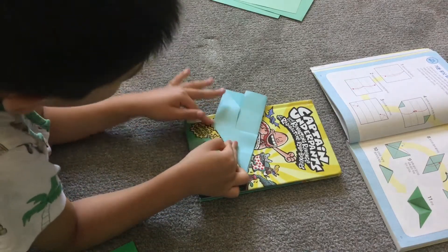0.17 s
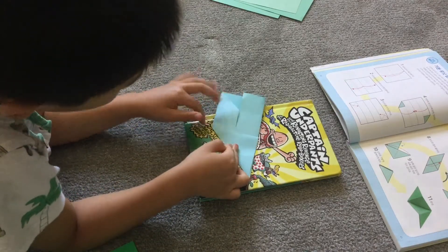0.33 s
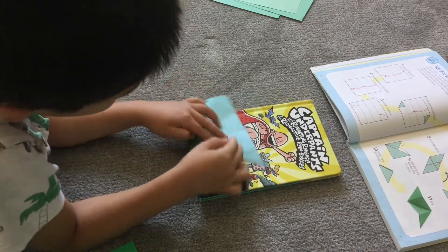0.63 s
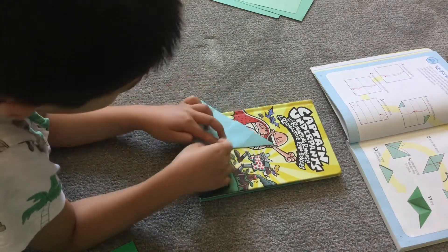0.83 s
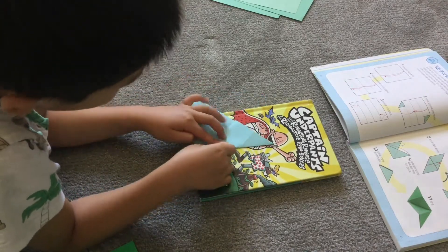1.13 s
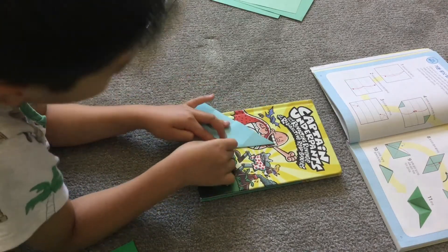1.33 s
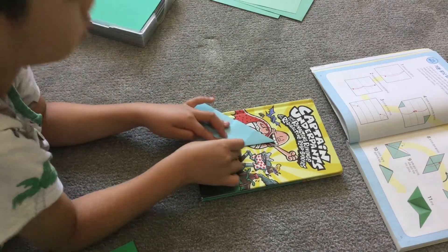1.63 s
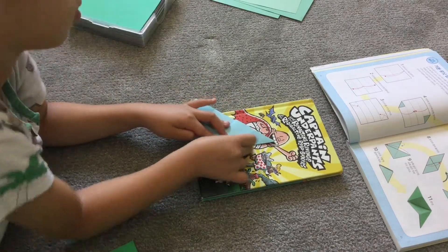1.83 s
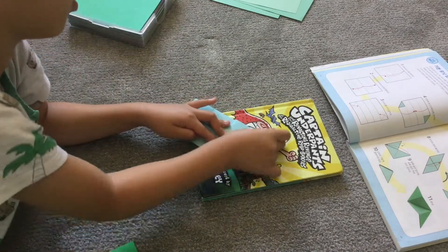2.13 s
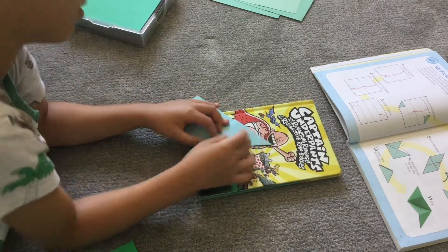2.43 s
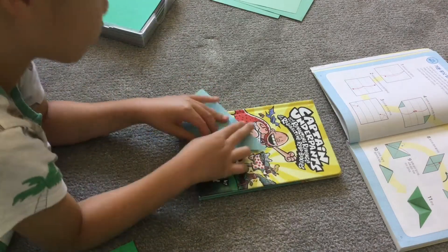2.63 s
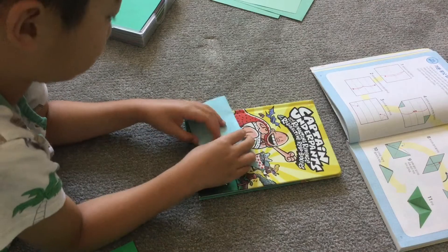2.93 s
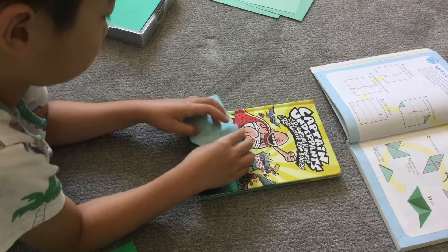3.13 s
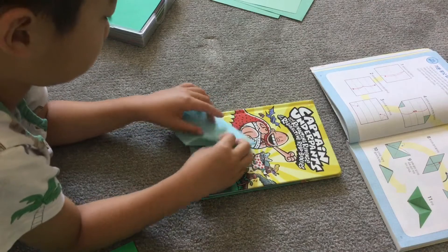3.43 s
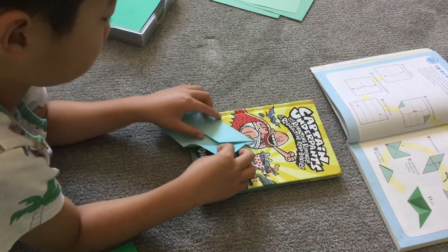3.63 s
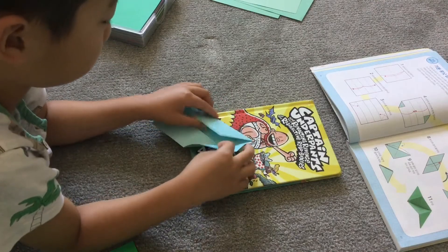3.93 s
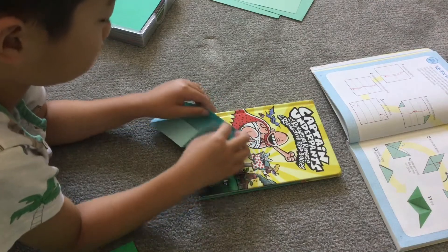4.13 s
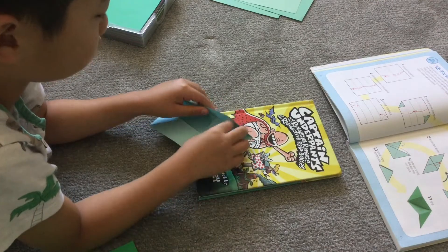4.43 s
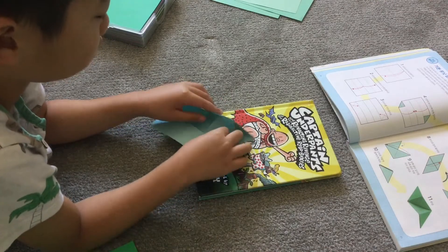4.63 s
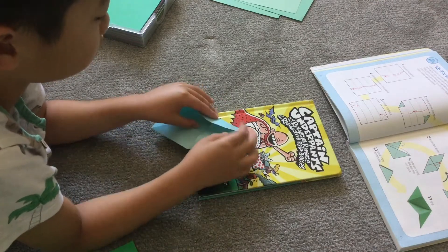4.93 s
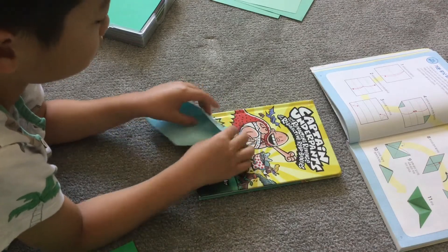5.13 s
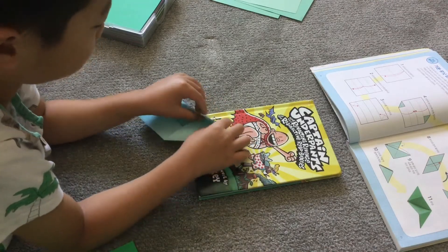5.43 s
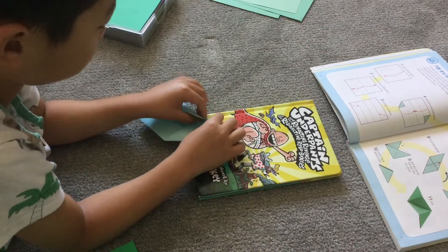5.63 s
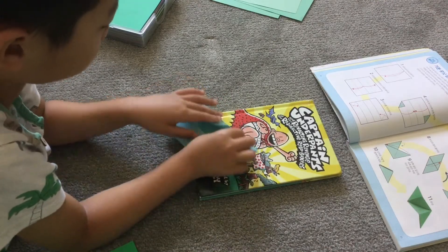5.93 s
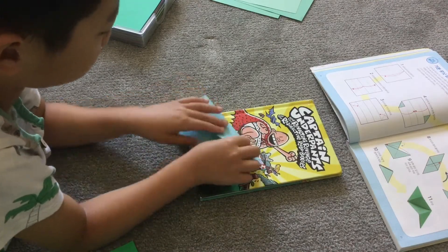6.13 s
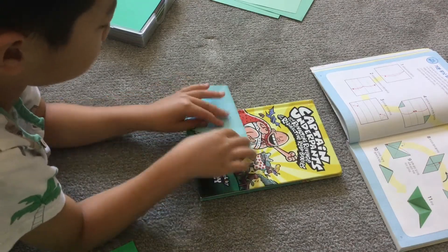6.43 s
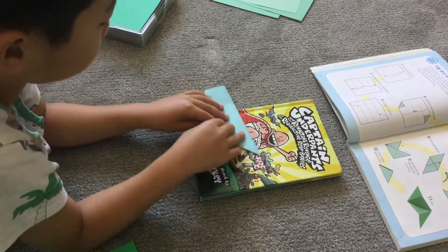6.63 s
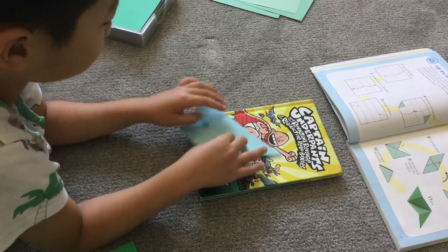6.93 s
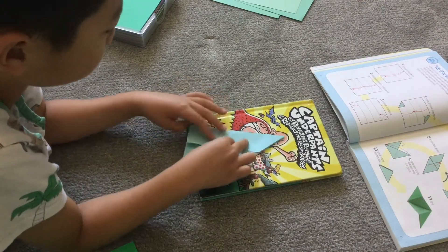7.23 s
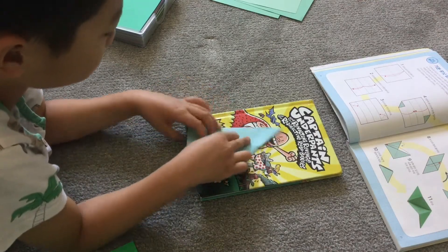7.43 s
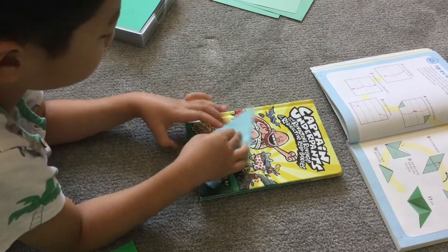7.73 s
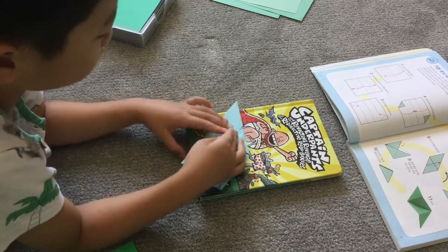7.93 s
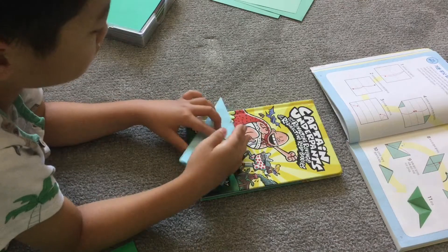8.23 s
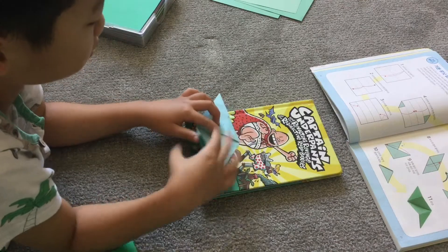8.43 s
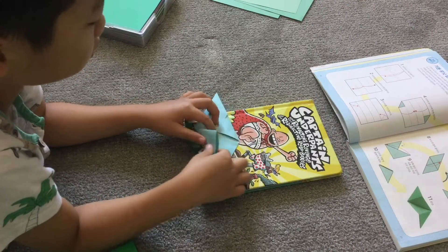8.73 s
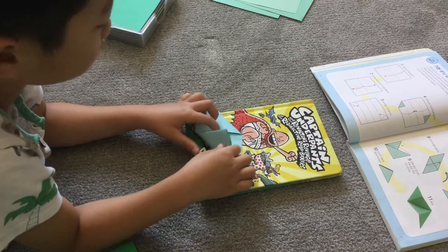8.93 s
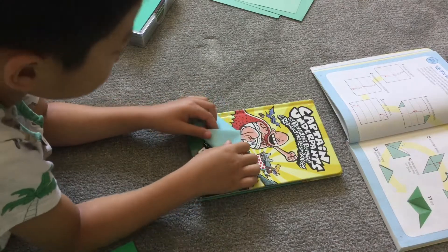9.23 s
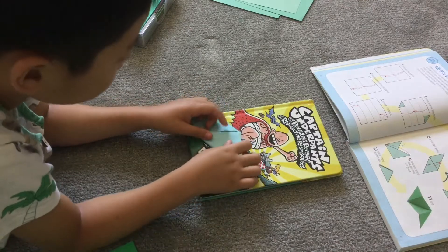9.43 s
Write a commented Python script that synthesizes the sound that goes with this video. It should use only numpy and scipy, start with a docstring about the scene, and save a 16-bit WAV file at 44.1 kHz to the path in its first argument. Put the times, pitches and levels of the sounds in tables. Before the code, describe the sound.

Close crisp paper folding with light crinkles and sharp snaps over faint low footfalls and room rumble, ending with a distant, booming door slam.

```python
"""Fingers slide along, crease and snap a sheet of paper on a hardback lying on carpet, close to a small microphone.
Slides are shaped noise plus random crinkles; snaps are short bursts through paper resonances, with a room tail.
Someone walks about the house: footfalls and other knocks are decaying sines, with a noise boom after them.
Near the end a door shuts in another room: decaying modes and a washed-out clatter. House rumble and hiss run on."""
import sys
import numpy as np
from scipy import signal
from scipy.fft import rfft, irfft, next_fast_len
from scipy.io import wavfile
from scipy.ndimage import uniform_filter1d

SR = 44100
rng = np.random.default_rng(int(sys.argv[2]) if len(sys.argv) > 2 else 0)


def dump_mix(stems):
    """Bounce the given channels to the path in sys.argv[1] as a 16-bit WAV at rate SR."""
    frames = np.atleast_2d(stems).T  # one column per channel
    limited = np.clip(frames, -1, 1)  # hard clip at full scale
    pcm = np.round(limited * 32767).astype(np.int16)
    wavfile.write(sys.argv[1], SR, pcm)


N = 422037


def undb(db):
    """dB to amplitude."""
    return 10 ** (np.asarray(db) / 20)


def unit_rms(x):
    """Scale to rms 1."""
    return x / np.sqrt(np.mean(x ** 2))


def coloured_noise(spectrum):
    """White noise shaped by f/Hz, level/dB points, joined over log frequency; rms 1."""
    f_hz, level_db = np.transpose(spectrum)
    size = next_fast_len(N)
    bins_hz = np.maximum(np.arange(size // 2 + 1) * SR / size, 1)
    gain_db = np.interp(np.log(bins_hz), np.log(f_hz), level_db, -120, -120)
    spectrum_out = rfft(rng.standard_normal(N), size) * undb(gain_db)
    return unit_rms(irfft(spectrum_out, size)[:N])


def walk(rate_hz):
    """Random levels, each held 1 / rate_hz and slewed twice; spread near 1."""
    hold = int(SR / rate_hz)
    levels = np.repeat(rng.standard_normal(N // hold + 1), hold)
    return 1.3 * uniform_filter1d(uniform_filter1d(levels, hold), hold)[:N]


def band(x, f_hz, width_hz):
    """Two-pole resonance, gain 1 at the centre."""
    b, a = signal.iirpeak(f_hz, f_hz / width_hz, SR)
    return signal.lfilter(b, a, x)


def ring(f_hz, t60_s, rise_s):
    """A mode pushed for about rise_s, then dying away; envelope peak 1."""
    t = np.arange(int(SR * (t60_s + rise_s))) / SR
    envelope = (1 - np.exp(-t / rise_s)) ** 2 * np.exp(-t * np.log(1000) / t60_s)
    return envelope / envelope.max() * np.sin(2 * np.pi * f_hz * t)


def add(track, start_s, sound):
    """Mix sound into track from start_s, cut at the end."""
    i = int(start_s * SR)
    track[i:i + len(sound)] += sound[:N - i]


# finger strokes over the sheet; the one at 8.976 also carries some of the door's mid-pitched noise:
# t/s (start), length/s, loudest at share of length (held to 0.05-0.95),
# fine hiss level/dB, sheet rustle level/dB, flexing level/dB
STROKES = [(0.128, 0.56, 0.14, -76, -79, -81.5), (0.358, 0.16, 0.78, -73, -76, -75),
           (0.478, 0.18, 0.36, -62, -64, -70), (0.592, 0.22, 0.48, -55.5, -61.5, -69.5),
           (0.923, 0.1, 0.16, -68.5, -71, -85), (1.19, 0.097, 0.67, -69, -85, -88),
           (1.532, 0.087, 0.42, -73.5, -75, -71), (1.63, 0.1, 0.05, -73, -78, -77),
           (1.7, 0.26, 0.24, -79, -82, -79.5), (1.8, 0.3, 0.42, -70, -77.5, -80),
           (1.952, 0.19, 0.3, -67.5, -79.5, -80), (2.065, 0.16, 0.68, -90, -95, -77.5),
           (2.3, 0.092, 0.3, -73, -77, -70.5), (2.345, .075, 0.4, -72, -79, -85),
           (2.407, 0.11, 0.47, -74, -79.5, -73), (2.497, 0.11, 0.3, -68, -70.5, -64),
           (2.6, 0.097, 0.3, -65, -64, -65), (2.681, 0.14, 0.04, -69, -78, -76),
           (2.887, 0.26, 0.08, -68.5, -73, -75.5), (3.064, 0.18, 0.34, -64.5, -70.5, -73),
           (3.195, 0.17, 0.18, -64.5, -72, -71.5), (3.288, 0.18, 0.2, -65.5, -75.5, -77.5),
           (3.385, 0.12, 0.25, -62, -71, -73.5), (3.452, 0.14, 0.42, -68, -75, -76),
           (3.548, 0.13, 0.13, -72, -72, -83), (3.767, 0.098, 0.3, -76, -73, -82),
           (3.907, 0.14, 0, -67, -78, -80), (4.0, 0.34, 0.27, -76, -73, -74),
           (4.165, 0.16, 0.1, -64, -65.5, -64.5), (4.27, 0.25, 0.28, -52.5, -55.5, -62),
           (4.465, 0.17, 0.2, -68, -75, -69), (4.573, 0.23, 0.42, -67.5, -72.5, -77.5),
           (4.761, 0.12, 0.24, -62.5, -73, -66), (4.845, 0.14, 0.19, -65, -68.5, -74.5),
           (5.064, 0.21, 0.52, -59, -65.5, -70), (5.17, 0.22, 0.31, -58, -64, -67.5),
           (5.339, 0.11, 0.2, -58.5, -59.5, -69), (5.415, 0.11, 0, -77, -75, -70.5),
           (5.47, 0.12, 0.42, -72, -73.5, -80.5), (5.656, 0.051, 0.12, -66, -68.5, -72),
           (5.679, 0.27, 0, -54, -57.5, -62), (5.838, 0.074, 0.95, -60, -63, -63),
           (5.916, 0.28, 0, -64, -67, -71.5), (6.16, 0.27, 0.15, -63.5, -65, -68.5),
           (6.22, 0.29, 0.22, -56.5, -63, -70), (6.397, .2, 0.47, -73, -79, -82),
           (6.635, 0.045, .35, -77, -81, -80), (6.71, 0.25, 0.5, -57.5, -67.5, -76),
           (6.878, 0.26, .65, -57.5, -63.5, -77.5), (7.209, 0.071, .3, -69.5, -80.5, -95),
           (7.291, 0.089, 0.72, -69, -73, -82), (7.346, 0.42, 0.46, -63.5, -67.5, -80),
           (7.728, 0.16, 0.41, -55, -65, -71.5), (7.975, 0.15, 0.44, -64.5, -68, -78),
           (8.095, 0.042, 0.12, -61.5, -59.5, -65), (8.135, 0.23, 0.33, -67.5, -75, -83),
           (8.326, 0.21, 0.74, -68.5, -71.5, -81), (8.68, .08, .7, -84, -82.5, -89),
           (8.74, 0.11, .15, -86, -74, -68), (8.808, 0.22, 0.45, -60, -68.5, -74),
           (8.976, 0.31, 0.4, -70, -70, -64), (9.206, 0.079, 0.18, -61, -66, -60),
           (9.297, 0.18, 0.28, -65.5, -67.5, -68.5), (9.478, 0.15, 0.8, -70, -74, -76)]
STROKE_POINT = 1.99  # 1 is a rounded swell, more is more pointed
RESTING_DB = (-83.5, -84, -83)  # hiss, rustle, flexing while the fingers only hold the sheet
# after a 1 ms snap: hiss re its edge, rustle and flexing re its panel, flexing re its flap
SETTLE_DB, SETTLE_T60_S, SETTLE_RISE_S = (-22.5, -24, -20, -15), 0.12, 0.0013
SETTLE_SPLIT_HZ = 2200  # lower panels settle as flexing, higher as rustle
SETTLE_DB_PER_DOUBLING = 1  # longer snaps settle louder


def strokes():
    """Amplitudes of hiss, rustle, flexing: strokes swell and fade, snaps leave the sheet settling."""
    power = np.outer(undb(RESTING_DB) ** 2, np.ones(N))
    for start_s, length_s, top, *levels_db in STROKES:
        share = np.arange(int(length_s * SR)) / (length_s * SR)
        top = np.clip(top, .05, .95)
        ramp = np.minimum(share / top, (1 - share) / (1 - top))
        swell = np.sin(np.pi / 2 * ramp) ** STROKE_POINT
        for track, gain in zip(power, undb(levels_db)):
            add(track, start_s, (gain * swell) ** 2)
    t = np.arange(SR // 4) / SR
    settle = ((1 - np.exp(-t / SETTLE_RISE_S)) * undb(-60 * t / SETTLE_T60_S)) ** 2
    for start_s, level_db, f_hz, edge_db, flap_db, length_ms in SNAPS:
        level_db = level_db + SETTLE_DB_PER_DOUBLING * np.log2(length_ms)
        parts_db = level_db + np.add(SETTLE_DB, (edge_db, 0, 0, flap_db))
        edge, high, low, flap = undb(parts_db) ** 2
        high_share = 1 / (1 + (SETTLE_SPLIT_HZ / f_hz) ** 4)
        settled = (edge, high_share * high, (1 - high_share) * low + flap)
        for track, p in zip(power, settled):
            add(track, start_s, p * settle)
    return np.sqrt(power)


def crinkles(rate_hz, spread_db, lo_hz, hi_hz):
    """Tiny facets of the sheet popping at random, each with its own pitch; rms 1."""
    out, t = np.zeros(N), np.arange(256) / SR
    for when, pitch, size, cycles in rng.random((int(rate_hz * N / SR), 4)):
        f_hz = lo_hz * (hi_hz / lo_hz) ** pitch
        pop = np.sin(2 * np.pi * f_hz * t) * np.exp(-t * f_hz / (2.1 + 9 * cycles))
        level_db = -spread_db * np.log(1 - .95 * size)  # few pops are loud
        add(out, when * N / SR, undb(level_db) * pop)
    return unit_rms(out)


def patchy(x, spread_db, frames, bins):
    """Small areas of the sheet crinkle alone: level varies in patches of time and pitch."""
    z = signal.stft(x, nperseg=256)[2]
    field = uniform_filter1d(rng.standard_normal(z.shape), size=bins, axis=0)
    field = uniform_filter1d(field, size=frames, axis=1)
    gain = unit_rms(undb(spread_db * field / field.std()))
    return signal.istft(z * gain, nperseg=256)[1][:N]


# spectra of skin on paper, each: f/Hz, level/dB (per Hz, relative)
HISS_SPECTRUM = [(5800, -16), (7000, -7.5), (9500, -4.5), (12200, 2), (13500, -4), (15000, -6.5),
                 (16000, -17), (16500, -44)]
RUSTLE_SPECTRUM = [(1800, -13), (2500, -11), (3600, 4), (5000, 5.5), (6500, 1.5), (8000, -24.5)]
FLEX_SPECTRUM = [(400, -0.5), (650, 0.5), (950, -5), (1500, 0), (2300, 1.5), (3300, -6)]


def slide():
    """Skin on paper: a fine hiss, the sheet's rustle and its slower flexing, the last two partly crinkles."""
    hiss_amp, rustle_amp, flex_amp = strokes()
    hiss = coloured_noise(HISS_SPECTRUM)
    rustle = coloured_noise(RUSTLE_SPECTRUM)
    flex = coloured_noise(FLEX_SPECTRUM)
    # a flat stroke only swishes; the more the sheet flexes, the more it crinkles
    flex_re_hiss_db = 20 * np.log10(flex_amp / hiss_amp)
    creasing = np.clip((flex_re_hiss_db + 16) / 14, 0, 1)
    rustle = rustle + creasing * undb(-10.5) * crinkles(160, 3.5, 2400, 6500)
    flex = flex + creasing * undb(-3.5) * crinkles(110, 5.3, 624, 2630)
    mix = hiss_amp * hiss + rustle_amp * rustle + flex_amp * flex
    return patchy(mix, spread_db=3.24, frames=6, bins=3)


def afterboom(blows, re_blow_db, t60_s):
    """Power that swells after each blow and dies away."""
    out, t = np.zeros(N), np.arange(SR) / SR
    shape = (1 - np.exp(-t / BOOM_RISE_S)) * undb(-60 * t / t60_s)
    for start_s, level_db, *_ in blows:
        add(out, start_s, (undb(level_db + re_blow_db) * shape) ** 2)
    return out


# boom spectra, each: f/Hz, level/dB (per Hz, relative)
BOOM_LOW_SPECTRUM = [(22, -26), (40, -8), (55, 1.5), (80, -3.5), (110, -7), (150, -22.5)]
BOOM_UPPER_SPECTRUM = [(100, -23.5), (140, 1.5), (250, -6.5), (400, -16), (700, -45)]
# low boom under the blows, before its random swing: t/s, level/dB
STIR = [(0.0, -67.5), (0.53, -75), (0.67, -64), (0.9, -74), (1.52, -68), (1.73, -70.5), (3.63, -67),
        (3.89, -69.5), (4.74, -52), (5.25, -51.5), (5.89, -58.5), (6.24, -57.5), (6.96, -71), (8.95, -72.5),
        (9.09, -62), (9.25, -37.5), (9.49, -47.5), (9.57, -60)]
STIR_SWING_DB, BOOM_UPPER_DB = 3.5, -74.5
STEP_BOOM_DB, STEP_BOOM_UPPER_DB, KNOCK_BOOM_DB = -3.5, -19, -11.5  # re the blow's table level
STEP_BOOM_DB_PER_OCTAVE = -2.5  # re 70 Hz: higher boards shake the joists less
BOOM_RISE_S, BOOM_T60_S, UPPER_T60_S = 0.015, 0.46, 0.44


def boom():
    """Joists and rooms ring on unevenly, too many modes to tell apart: two bands of noise."""
    stir_s, stir_db = np.transpose(STIR)
    stir_curve_db = np.interp(np.arange(N) / SR, stir_s, stir_db)
    stir = undb(stir_curve_db + STIR_SWING_DB * walk(8))
    low_blows = [(start_s, level_db + STEP_BOOM_DB_PER_OCTAVE * np.log2(f_hz / 70))
                 for start_s, level_db, f_hz, _ in STEPS]
    low_power = stir ** 2 + afterboom(low_blows, STEP_BOOM_DB, BOOM_T60_S)
    upper_power = undb(BOOM_UPPER_DB) ** 2
    upper_power = upper_power + afterboom(STEPS, STEP_BOOM_UPPER_DB, UPPER_T60_S)
    upper_power = upper_power + afterboom(KNOCKS, KNOCK_BOOM_DB, UPPER_T60_S)
    low = np.sqrt(low_power) * coloured_noise(BOOM_LOW_SPECTRUM)
    upper = np.sqrt(upper_power) * coloured_noise(BOOM_UPPER_SPECTRUM)
    return low + upper


# house and microphone noise: f/Hz, level/dB (per Hz, relative)
HUSH_SPECTRUM = [(15, -55), (25, -19), (53, -6.5), (83, 5.5), (177, -8.5), (280, -5), (483, -15),
                 (1010, -22), (2460, -31), (3150, -31.5), (5130, -38.5), (7300, -29), (12200, -33.5),
                 (15200, -51), (16500, -61)]
HUSH_DB = -70  # rms


def hush():
    """Steady house rumble and microphone hiss: shaped noise."""
    return undb(HUSH_DB) * coloured_noise(HUSH_SPECTRUM)


# creases snapping: t/s, panel peak level/dB, panel f/Hz, crisp edge level/dB re panel,
# low flap level/dB re panel, length/ms
SNAPS = [(0.4487, -63.5, 1160, -10, 11, 1.8), (0.542, -59, 3620, -3, -20, 0.9),
         (0.5566, -29.5, 3770, -8, -10, 0.26), (0.5688, -40, 2130, -10, -30, 1.2),
         (0.5753, -37.5, 2230, -18, -29, 0.91), (0.671, -24.5, 4800, -4, -46, 0.33),
         (0.684, -64, 4310, -8, -18, 2.9), (0.9469, -43.5, 1780, 7.5, -30, 2.8),
         (0.9565, -47, 3800, -9, -8.5, 4.1), (1.0077, -60.5, 2500, 3, -17, 2.8),
         (1.3155, -57, 2250, 7, -13, 0.46), (2.163, -60, 1830, -19, -13, 0.5),
         (2.1785, -54, 1660, -2, -17, 0.41), (2.385, -54, 4370, 10, -5, 0.65),
         (2.4888, -55, 1920, -10, 7.5, 0.32), (2.5066, -46, 1750, -1, -22, 0.78),
         (2.521, -44, 2900, -2, 0.5, 1.9), (2.6235, -60, 2870, 0, 3, 1.6),
         (2.6403, -44.5, 1800, -10, 0.5, 1.4), (2.6985, -30.5, 3500, -0.5, -16, 0.24),
         (2.709, -62, 3120, 3, -6, 0.4), (2.9348, -38.5, 5900, -2, -14.5, 2.4),
         (3.122, -49, 4520, -18, -27, 1.4), (3.1563, -48.5, 3750, 4, -24, 1.6),
         (3.417, -54.5, 3260, 11, -25, 1), (3.428, -55, 4760, -4, -21, 4.0),
         (3.606, -49, 4180, 5.5, -13, 2.8), (3.8285, -57, 4390, 4.5, -15, 4.8),
         (4.0798, -36.5, 3280, -19, -9.5, 2.1), (4.1972, -44, 3970, 0, -5, 1.5),
         (4.2945, -35.5, 2130, -20, -3.5, 1.2), (4.348, -41, 3380, -3, -21, 2.3),
         (4.3695, -39, 2410, 1, -10, 2.3), (4.402, -47, 1430, 12.5, 5.5, 4.0),
         (4.5035, -47.5, 4200, 4.5, -19, 6), (4.5113, -49, 3520, 7, -8, 4.0),
         (4.5196, -54, 1370, -6, 10.5, 3.9), (4.532, -52, 2090, 12, -10, 0.9),
         (4.539, -58, 1420, -10, 13, 2.9), (4.7684, -49, 2130, 7, -18, 0.55),
         (4.7892, -44, 2570, 6, -25, 0.89), (4.798, -38, 2770, 1, -38, 2),
         (4.8045, -61, 2710, -9, -18, 4.4), (4.9112, -37, 2450, 5.5, -6, 0.83),
         (4.9207, -60, 2580, 0, -5, 4.6), (5.103, -48, 3270, -5, -4, 0.95),
         (5.129, -41.5, 3650, 8, -7, 0.6), (5.1385, -47, 4260, 13.5, -22, 1.1),
         (5.2168, -40, 2120, -7, -31, 0.4), (5.2437, -44.5, 3760, 6, -29, 4.0),
         (5.301, -53.5, 1320, 3, -7, 2.6), (5.331, -54.5, 2330, -8, -4, 4.3),
         (5.35, -57, 4270, 20, -13, 0.4), (5.357, -42, 1920, 5.5, -2, 3.3),
         (5.3668, -49, 4190, 0, 0.5, 2.6), (5.4277, -47, 1720, 0, -16, 0.75),
         (5.4355, -60, 1590, 0, 9.5, 1.5), (5.53, -63, 3350, 10, -12, 1.5),
         (5.661, -62, 1820, 8.5, -19.5, 0.5), (5.6952, -17, 3750, 6, -26, 0.5),
         (5.708, -40.5, 3710, -11, -34, 1.1), (5.8606, -41.5, 3700, -7, -6, 0.77),
         (5.9135, -37, 2970, 1, -8, 2.8), (5.9148, -20, 3860, -2, -18, 0.76),
         (5.9236, -34, 3700, -8, -17, 4.7), (5.933, -47, 3520, -5, -20, 3.5),
         (6.1768, -48.5, 4100, 10.5, -20, 0.86), (6.2084, -46, 2120, -11, -14, 3.4),
         (6.2213, -53.5, 3610, 12.5, -7, 1.4), (6.29, -50, 5030, -8, -22, 1.0),
         (6.5685, -61, 1650, -14, -4, 0.6), (6.648, -54.5, 4720, -3, -18, 1.1),
         (7.3492, -60, 4180, 11, -2, 2.8), (7.592, -60, 4850, -12, -19, 2.6),
         (7.6724, -50.5, 1720, -19, -6.5, 1.7), (7.8352, -51, 6000, -13, -11, 2.6),
         (8.0045, -59, 2550, 11, -4, 1.7), (8.1042, -46, 2730, 2.5, -8, 2.5),
         (8.494, -50, 1440, -18, -17, 0.76), (8.505, -48.5, 3140, -15, -30, 2.8),
         (8.5334, -55.5, 1760, -13, -13, 0.95), (8.749, -38.5, 2000, -28, -27, 0.66),
         (8.7594, -39.5, 2200, -7, -24, 0.92), (8.764, -47, 2100, -25, -31, 2.4),
         (8.845, -49.5, 2600, -1, -28, 0.46), (8.855, -53, 4020, 6, -23, 0.7),
         (9.109, -57, 1050, -7, -15, 3.5), (9.2239, -30, 2750, 0.5, -25, 0.69),
         (9.233, -58, 1600, -8, -14, 2.2), (9.3217, -44, 2560, 1.5, -15, 1.15),
         (9.347, -51, 3130, 10.5, -3, 1.9), (9.4748, -39, 2200, -18, -14, 0.5)]


def snaps():
    """A crease buckles: a short burst rings a paper panel, with a crisp edge and a low flap."""
    out, t = np.zeros(N), np.arange(2048) / SR
    for start_s, level_db, f_hz, edge_db, flap_db, length_ms in SNAPS:
        length_s = length_ms / 1000
        envelope = np.exp(-t / length_s) * (1 - np.exp(-t / (0.13 * length_s)))
        burst = rng.standard_normal(len(t)) * envelope  # the buckle runs along the fold
        panel = band(band(burst, f_hz, 1.08 * f_hz), f_hz, 0.8 * f_hz)
        panel = panel + 2.0 * band(burst, 0.985 * f_hz, 0.017 * f_hz)  # rings on briefly
        edge = band(band(burst, 12230, 5700), 12300, 8100)
        flap = band(band(burst, 500, 1500), 800, 1250)
        panel, edge, flap = (part / np.abs(part).max() for part in (panel, edge, flap))
        add(out, start_s, undb(level_db) * (panel + undb(edge_db) * edge + undb(flap_db) * flap))
    return out


ROOM_DB, ROOM_T60_S, ROOM_GAP_S = -13.5, 0.18, 0.0067


def room(x):
    """Adds a short diffuse tail, duller than the direct sound."""
    t = np.arange(int(.4 * SR)) / SR
    tail = rng.standard_normal(len(t)) * undb(-60 * t / ROOM_T60_S) * (t > ROOM_GAP_S)
    tail = signal.lfilter([1], [1, -.4], tail)
    tail = tail / np.sqrt(np.sum(tail ** 2))
    return x + undb(ROOM_DB) * signal.fftconvolve(x, tail)[:N]


def thuds(table, rise_s, partners):
    """Soft blows: each rings just under its table pitch, with weaker (ratio, dB) partners."""
    out = np.zeros(N)
    for start_s, level_db, f_hz, t60_s in table:
        for ratio, partner_db in [(0.99, 0.0034)] + partners:
            tone = ring(f_hz * ratio, t60_s / ratio, rise_s)
            add(out, start_s - rise_s, undb(level_db + partner_db) * tone)
    return out


# footfalls, and last the door's jolt to the floor: t/s, level/dB, boards' nominal f/Hz, nominal t60/s
STEPS = [(0.574, -29, 95, 0.083), (0.617, -35, 103.8, 0.28), (.716, -49, 90.4, .25),
         (1.308, -43.5, 62.4, 0.29), (1.448, -56, 74.4, 0.32), (1.873, -37.5, 68.6, 0.29),
         (1.99, -47.5, 72.7, 0.28), (2.413, -38.5, 63, 0.19), (2.521, -50.5, 81.6, 0.16),
         (2.967, -40, 67.4, 0.27), (3.348, -51, 78, 0.14), (3.467, -42.5, 79.3, 0.19),
         (3.548, -41.5, 76, 0.078), (4.028, -38.5, 58.8, 0.35), (4.462, -46.5, 75.5, 0.11),
         (4.543, -41.5, 78.2, 0.15), (4.774, -47, 64.3, 0.27), (5.003, -42.5, 78.6, 0.19),
         (5.053, -42.5, 74.7, 0.18), (5.099, -43, 64, 0.17), (5.177, -48.5, 58, 1),
         (5.379, -51.5, 56, 0.68), (5.647, -44.5, 83, 0.16), (6.184, -47.5, 67.1, 0.51),
         (6.3, -48, 67, 0.21), (6.538, -44, 67.4, 0.22), (7.519, -57, 67.3, 0.37), (8.057, -57, 64, 0.15),
         (9.089, -21, 96.8, 0.35)]


def footfalls():
    """Feet push the floorboards, which ring low; a weaker, higher partner roughens the low tone."""
    return thuds(STEPS, rise_s=0.01385, partners=[(1.22, -12), (1.0, -22.5)])


# knocks of hand and knee, and last a faint one just before the door shuts:
# t/s, level/dB, nominal f/Hz, nominal t60/s
KNOCKS = [(0.578, -46, 166, 0.081), (0.716, -52.5, 206, 0.13), (1.915, -57, 159.5, 0.21),
          (1.982, -57, 212, 0.08), (2.393, -53.5, 219, 0.071), (4.078, -65.5, 295, 0.28),
          (4.192, -36, 218, 0.2), (4.29, -52.5, 292, 0.11), (9.022, -53.5, 224, 0.14)]


def knocks():
    """Small knocks: a quicker push than a footfall, higher pitches and wider partners."""
    return thuds(KNOCKS, rise_s=0.00406, partners=[(1.33, -5), (1.9, -18.5), (2.9, -18.5)])


# modes of the door and its frame: f/Hz, level/dB re DOOR_DB, t60/s
DOOR_MODES = [(60.6, -2, 0.93), (78, -28, 0.78), (94.7, -4, 0.99), (117, -12, 0.87), (152, -4, 0.81),
              (183, -7.5, 0.72), (244, -7.5, 0.65), (294.3, -14.5, 0.9), (342, -19, 0.75), (390, -20, 0.85)]
DOOR_S, DOOR_DB = 9.078, -30
# clatter through the rooms between: f/Hz, level/dB (per Hz, relative)
WASH_SPECTRUM = [(180, -10), (300, 4.5), (460, -11), (523, -5.5), (735, -13), (1010, -9), (1110, -12),
                 (1940, -19.5), (9000, -43.5), (11700, -74), (19800, -120)]
WASH_DB, WASH_T60_S, WASH_RISE_S, WASH_SWING_DB = -34.5, 0.71, 0.027, 1.9


def door():
    """The slam rings door and frame; its clatter swells late, washed out by the rooms between."""
    modes = np.zeros(N)
    for k, (f_hz, level_db, t60_s) in enumerate(DOOR_MODES):
        sign = (-1) ** k
        add(modes, DOOR_S, sign * undb(DOOR_DB + level_db) * ring(f_hz, t60_s, 0.57 / f_hz))
    t = np.maximum(np.arange(N) / SR - DOOR_S, 0)
    decay = undb(-60 * t / WASH_T60_S + WASH_SWING_DB * walk(27))
    swell = (1 - np.exp(-t / WASH_RISE_S)) ** 2 * decay
    return modes + undb(WASH_DB) * swell * coloured_noise(WASH_SPECTRUM)


def scene():
    """Sum of all sources, one channel; only the snaps get the room tail."""
    paper = slide() + room(snaps())
    house = boom() + hush() + footfalls() + knocks() + door()
    return (paper + house)[None]


BOTTOM_HZ, TOP_HZ = 33, 16000


def record(dry):
    """The small microphone loses the deepest bass; the recorder cuts the top."""
    high_pass = signal.butter(2, BOTTOM_HZ, "high", fs=SR, output="sos")
    low_pass = signal.ellip(8, .2, 70, TOP_HZ, fs=SR, output="sos")
    return signal.sosfilt(low_pass, signal.sosfilt(high_pass, dry))


dry = scene()
out = record(dry)
dump_mix(out)
```